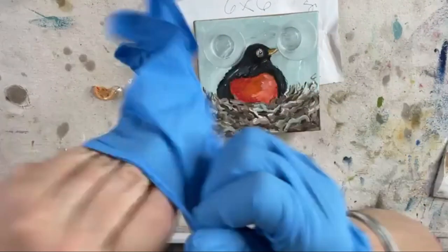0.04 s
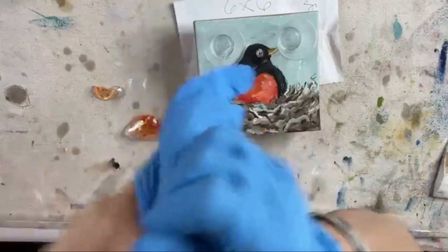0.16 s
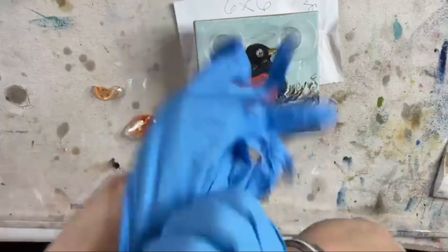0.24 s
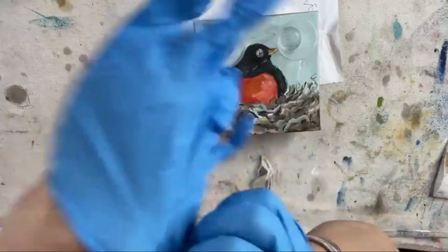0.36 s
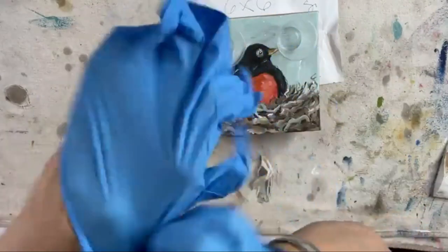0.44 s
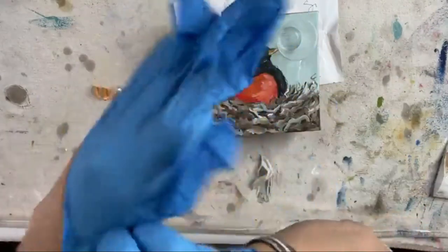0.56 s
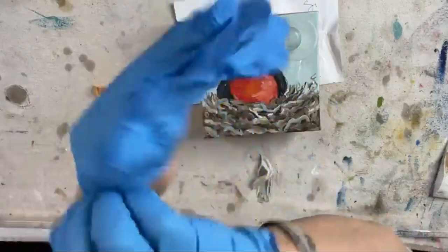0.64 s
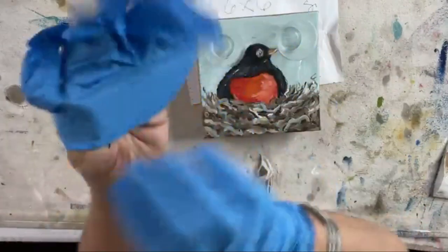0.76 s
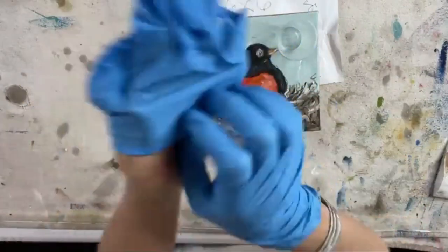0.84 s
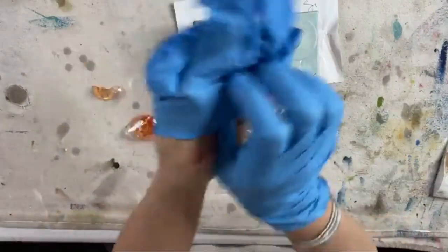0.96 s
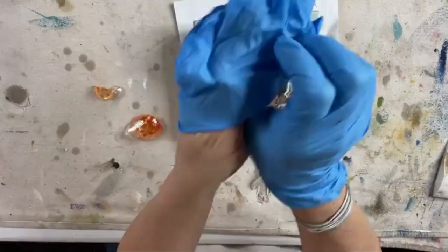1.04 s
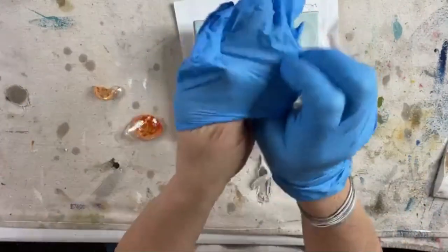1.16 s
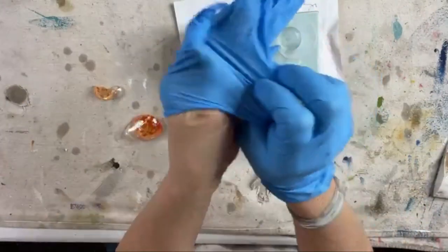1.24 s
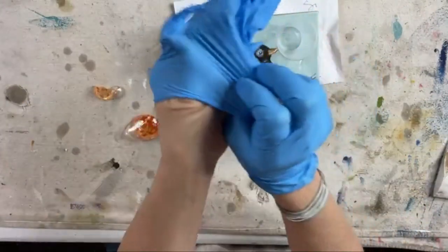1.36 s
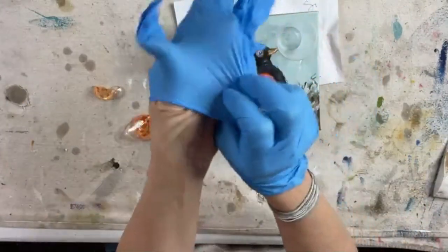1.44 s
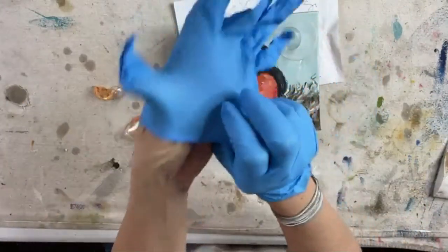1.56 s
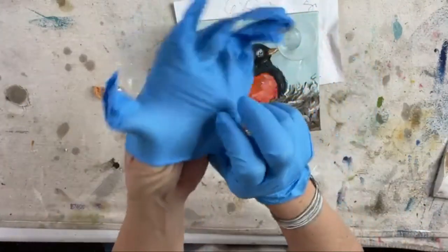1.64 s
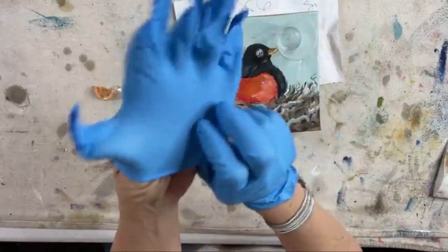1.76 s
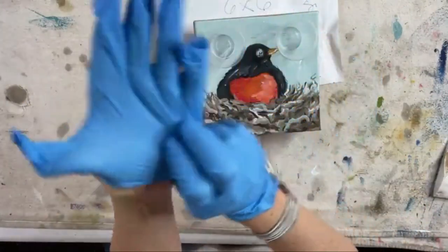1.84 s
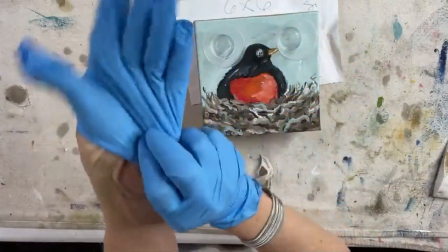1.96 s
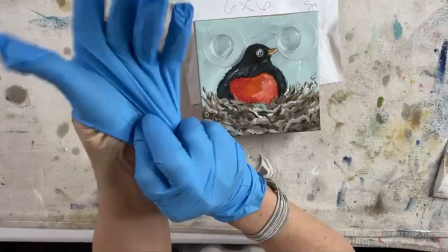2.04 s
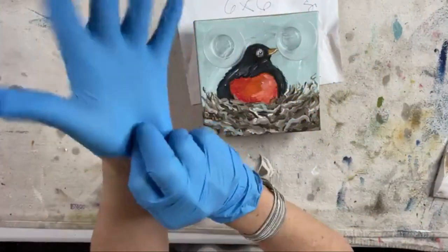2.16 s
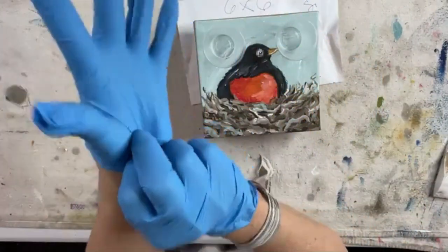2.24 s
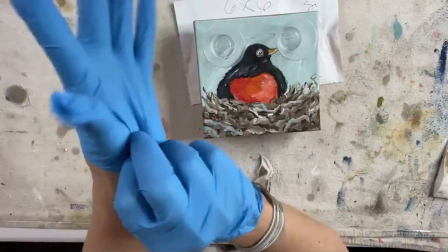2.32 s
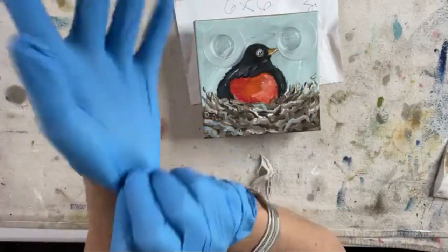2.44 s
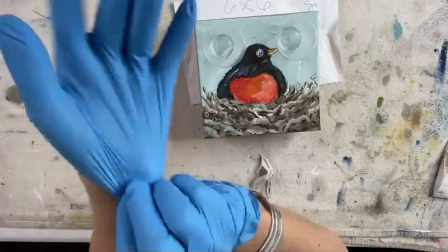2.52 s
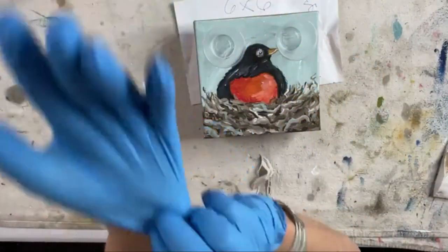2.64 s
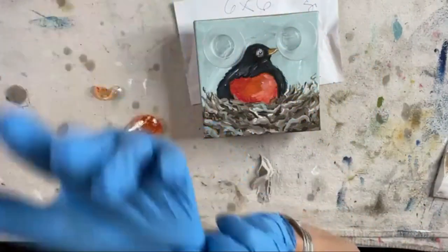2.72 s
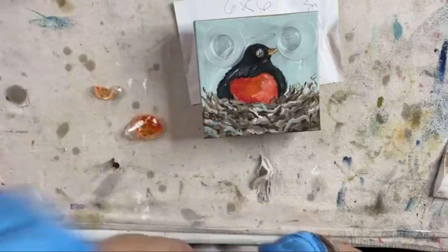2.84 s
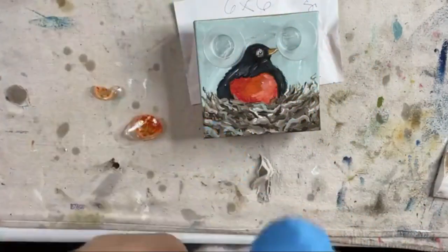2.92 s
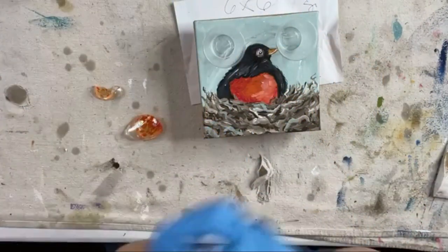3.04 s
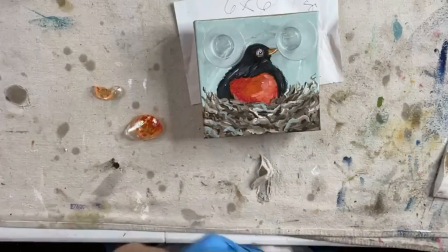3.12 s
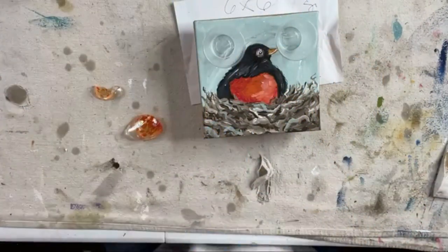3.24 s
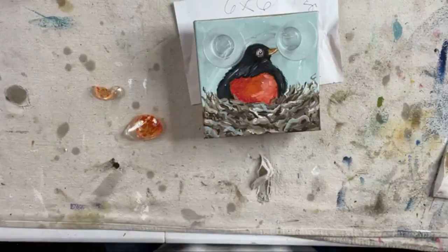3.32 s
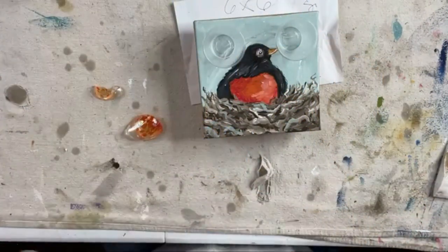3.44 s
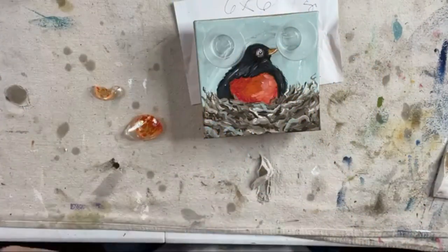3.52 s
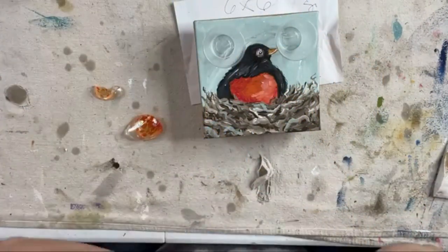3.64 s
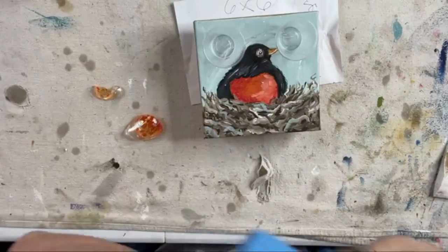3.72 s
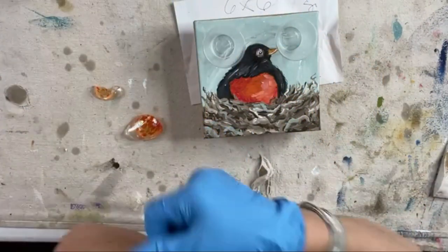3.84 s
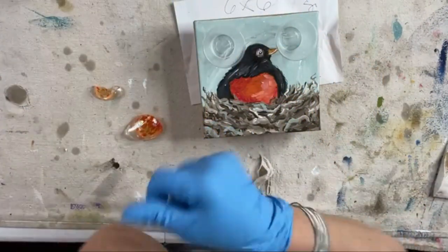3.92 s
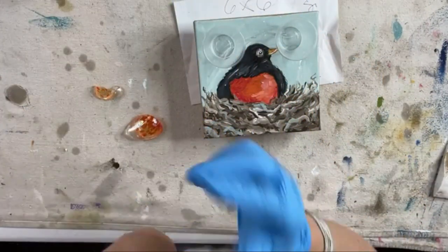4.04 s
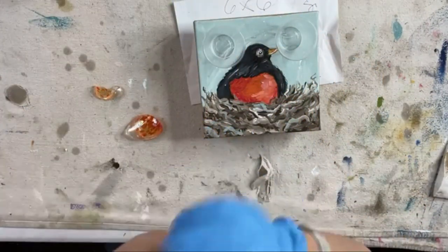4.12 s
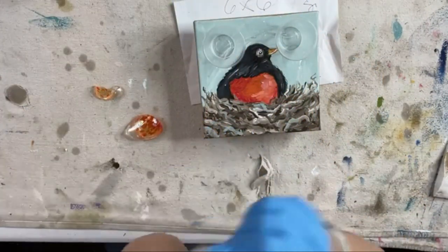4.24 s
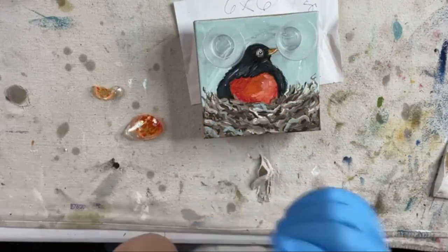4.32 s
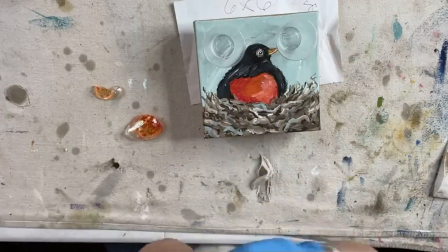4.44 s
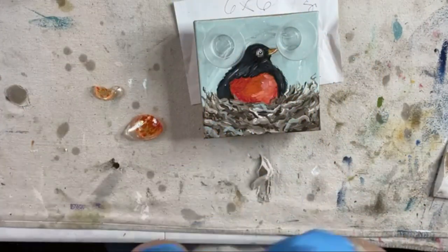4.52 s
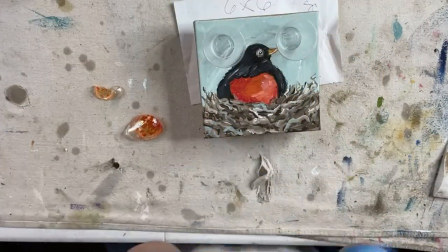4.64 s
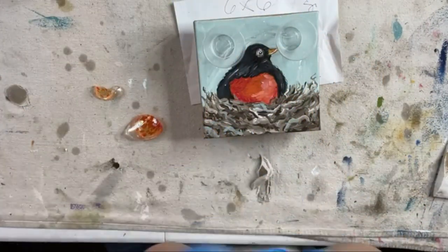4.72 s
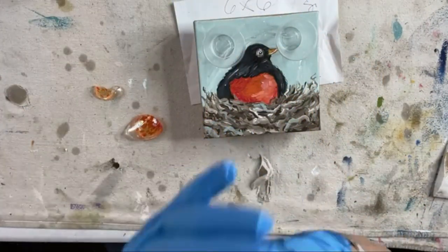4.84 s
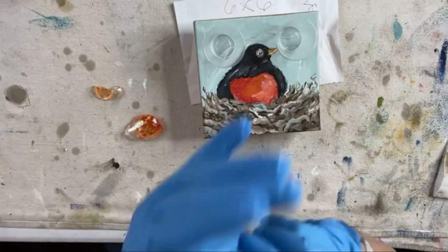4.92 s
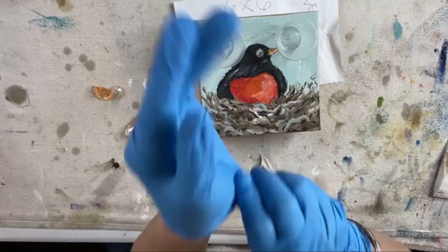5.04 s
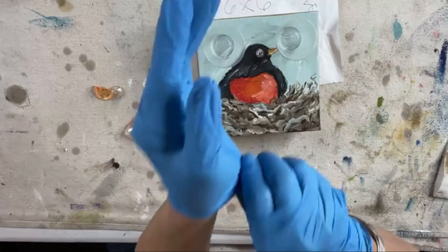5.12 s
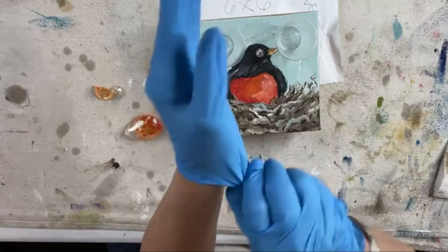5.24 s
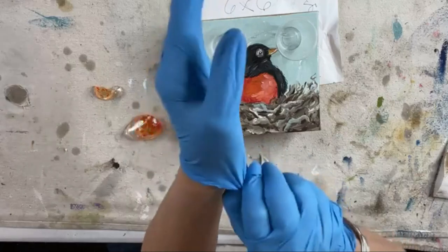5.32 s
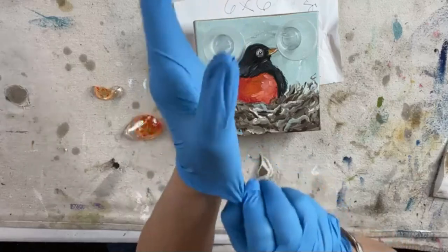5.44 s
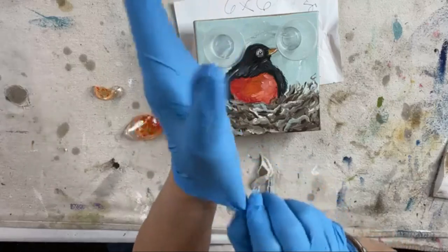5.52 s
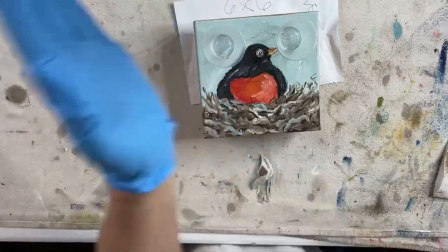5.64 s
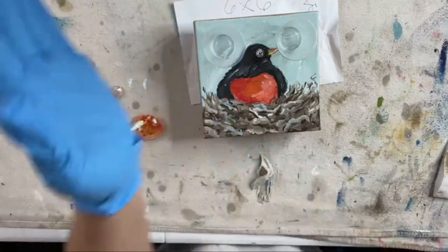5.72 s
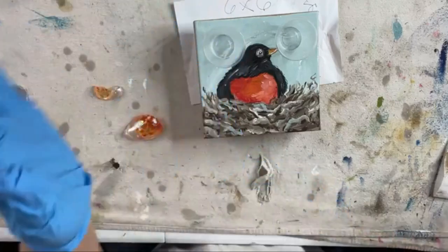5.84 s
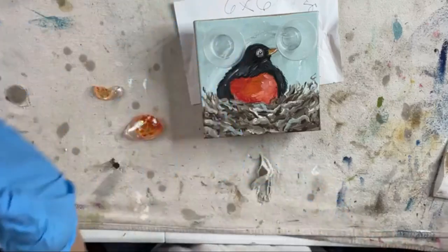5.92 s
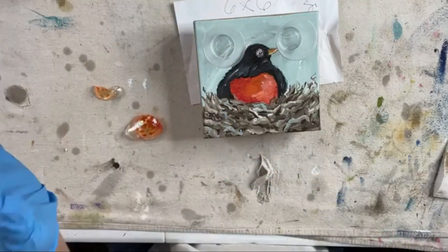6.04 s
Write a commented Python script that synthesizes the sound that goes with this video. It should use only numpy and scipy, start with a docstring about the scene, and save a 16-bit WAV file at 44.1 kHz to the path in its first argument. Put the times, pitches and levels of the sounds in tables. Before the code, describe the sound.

A thin rubber glove is pulled on close by, rustling and creaking, with sharp elastic snaps and one loudest snap near the end.

```python
"""In a small room, above a craft table, a thin rubber glove is pulled onto a hand close to the microphone.
Loose rubber rustles and hisses over skin, heard as filtered noise built from countless tiny clicks.
Stretched rubber creaks in stick-slip pulses that ring folds and drum the taut film, which also hums.
The cuff and the fingertips are plucked and snap back as bursts, falling rings and thumps; puffs of air
are low noise. The last snap is the loudest, and a bright band fades after it."""
import sys
import numpy as np
from scipy import signal
from scipy.fft import rfft, irfft
from scipy.io import wavfile

SR = 44100
rng = np.random.default_rng(int(sys.argv[2]) if len(sys.argv) > 2 else 0)


def dump(signal):
    """Clip the signal to [-1, 1] and save it as 16-bit WAV at the path in sys.argv[1]."""
    limited = np.clip(np.atleast_2d(signal).T, -1, 1)
    pcm = np.round(limited * 32767).astype(np.int16)
    wavfile.write(sys.argv[1], SR, pcm)


N = 267863
T = np.arange(N) / SR  # time [s]

# strokes of loose rubber over skin:
# (peak time [s], rise [s], fall [s], hiss level before tilt [dB], crumple level [dB])
STROKES = [ (0.13, 0.09, 0.053, -52, -54.5), (0.275, 0.06, 0.087, -49, -56.5),
           (0.375, 0.053, 0.07, -51.5, -55.5), (0.489, 0.055, 0.057, -44.5, -51.5),
           (0.635, 0.053, 0.044, -45, -50.5), (0.7, .06, 0.1, -58, -55.5),
           (0.827, 0.033, 0.018, -44.5, -66), (0.885, .09, 0.057, -56.5, -63),
           (0.99, 0.057, 0.057, -54.5, -57.5), (1.09, 0.036, 0.052, -46, -71),
           (1.162, 0.032, 0.037, -50, -83), (1.295, 0.056, 0.075, -53.5, -77),
           (1.46, 0.21, 0.49, -58.5, -54.5), (1.85, 0.082, 0.13, -60.5, -50),
           (1.97, 0.064, 0.069, -57, -52), (2.064, 0.089, 0.12, -50, -51.5),
           (2.275, 0.06, 0.13, -50.5, -53.5), (2.44, .08, .08, -57, -68), (2.6, 0.083, .12, -51, -49.5),
           (2.81, 0.07, 0.082, -53.5, -54), (2.945, 0.038, 0.018, -45, -54.5), (3.0, 0.055, 0.26, -65, -70),
           (3.09, 0.025, 0.017, -50, -73), (3.27, .04, 0.27, -59, -75), (3.547, 0.016, 0.027, -50.5, -61),
           (3.683, 0.042, 0.13, -49.5, -62.5), (4.005, 0.092, 0.055, -46, -53),
           (4.1, 0.047, .19, -65, -69.5), (4.369, 0.033, 0.031, -50.5, -64),
           (4.522, 0.014, 0.015, -50.5, -108), (4.655, 0.025, 0.016, -44, -58),
           (4.801, 0.013, 0.015, -47.5, -93), (4.92, 0.025, 0.058, -52, -66),
           (5.14, 0.11, 0.1, -58.5, -69.5), (5.241, 0.019, 0.016, -49.5, -57),
           (5.366, 0.024, 0.068, -59.5, -59), (5.57, 0.13, 0.13, -59, -57.5),
           (5.68, .04, 0.023, -53.5, -60), (5.89, 0.059, 0.17, -66, -67.5)]
# spectrum of slack rubber: (frequency [Hz], relative spectral density [dB])
SLACK_SPECTRUM = [(40, -49), (120, -11), (250, -0.5), (400, 4), (700, -2), (1300, 2), (2500, -2),
                  (5000, -13), (12000, -24.5)]
# spectrum of a slip or a sharp crease: (frequency [Hz], relative spectral density [dB])
SLIP_SPECTRUM = [(150, -16.5), (700, -1.5), (1500, -1.5), (4000, 6), (7000, -9.5), (10000, -35.5),
                 (16000, -46)]


def undb(db):
    """Amplitude ratio of a level in decibels."""
    return 10 ** (np.asarray(db) / 20)


def unit(x):
    """Normalization to a root-mean-square of 1."""
    return x / np.sqrt(np.mean(x ** 2) + 1e-20)


def high_pass(x, hz):
    """Fourth-order Butterworth attenuation below hz."""
    return signal.sosfilt(signal.butter(4, hz, "high", fs=SR, output="sos"), x)


def colour(x, points, size=2048):
    """Minimum-phase filtering: a folded cepstrum gives a causal response of unit energy through the points."""
    hz, db = np.transpose(points)
    f = np.maximum(np.arange(size // 2 + 1) * SR / size, 1)
    log_gain = np.log(undb(np.interp(np.log(f), np.log(hz), db)))
    cepstrum = irfft(log_gain)
    cepstrum[1:size // 2] *= 2
    cepstrum[size // 2 + 1:] = 0
    response = irfft(np.exp(rfft(cepstrum)))
    return signal.fftconvolve(x, response / np.linalg.norm(response))[:len(x)]


def ring(hz, t60, sag=0, size=4096):
    """Damped mode: as the rubber relaxes, pitch glides from half of the share sag above hz to half below."""
    decay = np.exp(-np.log(1000) * T[:size] / t60)
    phase = np.cumsum(hz * (1 + sag * (decay - .5))) / SR
    return np.sin(2 * np.pi * phase) * decay


def add(out, s, x):
    """Superposition of x onto out from time s."""
    i = int(np.clip(s * SR, 0, N))
    out[i:i + len(x)] += x[:N - i]


def walk(rate):
    """Random modulation: rate normal values per second, joined by lines, with a spread near 1."""
    steps = rng.standard_normal(4096)
    return 1.3 * np.interp(T * rate, np.arange(len(steps)), steps)


def grains(rate, spread_db):
    """Shot noise: clicks of uneven size at random instants, rate per second on average."""
    hit = rng.random(N) < rate / SR
    size = undb(spread_db * np.clip(rng.standard_normal(N), -2, 2))
    return unit(hit * rng.standard_normal(N) * size)


def swell(peak_s, rise_s, fall_s):
    """Envelope of one movement: peak gain 1, and 9.5 dB less one rise before or one fall after it."""
    drop_db, shape = 9.5, 1.5  # shape 1 is a pointed peak, 2 a round one
    near = slice(*np.searchsorted(T, [peak_s - 5 * rise_s, peak_s + 5 * fall_s]))
    away = np.maximum((peak_s - T[near]) / rise_s, (T[near] - peak_s) / fall_s)
    gain = np.zeros(N)
    gain[near] = undb(-drop_db * away ** shape)
    return gain


def swells(moves):
    """Incoherent summation: the powers of overlapping (peak s, rise s, fall s, dB) movements add."""
    return np.sqrt(sum((undb(db) * swell(peak, rise, fall)) ** 2 for peak, rise, fall, db in moves))


def quiet_air():
    """Stationary broadband noise forms the steady floor of the room."""
    # (frequency [Hz], relative spectral density [dB])
    air_spectrum = [(25, -20), (70, 2.5), (150, -3.5), (350, -7), (700, -11), (2000, -0.5), (5000, 2.5),
                    (9000, -13), (16000, -15.5)]
    return undb(-66.5) * colour(rng.standard_normal(N), air_spectrum)


def room(direct, spread, wet_db, size=32768):
    """Reflection and reverberation: table and wall echoes, and a tail whose decay depends on frequency."""
    # reverberation time: (frequency [Hz], time to fall by 60 dB [s])
    reverberation = [(100, 0.19), (350, 0.74), (1000, 0.88), (3300, 0.36), (6000, 0.47), (10000, 0.35),
                     (16000, 0.22)]
    table_s, table_db = 0.001309, -17
    wall_s, wall_db = .0115, -19
    t = T[:size]
    f = np.maximum(np.arange(size // 2 + 1) * SR / size, 1)
    hz, t60 = np.transpose(reverberation)
    noise = rfft(rng.standard_normal(size))
    # overlapping bands that sum to the full noise
    bands = [irfft(noise * np.interp(np.log(f), np.log(hz), band)) for band in np.eye(len(hz))]
    onset = np.clip((t - .003) / 0.0024, 0, 1)
    tail = sum(band * undb(-60 * t / decay) for band, decay in zip(bands, t60)) * onset
    out = direct + undb(wet_db) * signal.fftconvolve(spread, tail / np.linalg.norm(tail))[:N]
    add(out, table_s, undb(table_db) * direct)
    add(out, wall_s, undb(wall_db) * direct)
    return out


def puffing():
    """Turbulent flow: trapped air leaves the glove in soft low gusts of noise."""
    # gusts: (peak time [s], rise [s], fall [s], level [dB])
    gusts = [(0.31, 0.29, 0.47, -69.5), (0.486, 0.014, 0.022, -50), (0.625, 0.065, 0.031, -60),
             (1.663, 0.048, .05, -62), (2.055, 0.088, 0.036, -59.5), (4.61, .014, 0.016, -57.5),
             (4.89, 0.016, 0.033, -59), (5.707, 0.014, 0.012, -53)]
    # (frequency [Hz], relative spectral density [dB])
    gust_spectrum = [(25, -22), (55, -3), (90, -0.5), (180, -3.5), (400, -14), (1500, -52)]
    return swells(gusts) * colour(rng.standard_normal(N), gust_spectrum)


def shivering(start_s=5.708, low_hz=2900, high_hz=3850, level_db=-42, t60_s=0.71):
    """Exponential decay: after the hardest snap a bright band of noise lingers and fades."""
    band_filter = signal.butter(2, [low_hz, high_hz], "band", fs=SR, output="sos")
    band = signal.sosfilt(band_filter, rng.standard_normal(N))
    decay = (T > start_s) * np.exp(-np.log(1000) * np.abs(T - start_s) / t60_s)
    return undb(level_db) * unit(band) * decay


def humming(hz=338, waver=0.07, rough_db=2.5):
    """Self-sustained oscillation: slips in step with the palm film keep one rough, wavering note swinging."""
    # hums: (peak time [s], rise [s], fall [s], level [dB])
    hums = [(1.342, 0.022, 0.019, -55.5), (1.485, 0.044, 0.044, -44), (1.565, 0.056, 0.0596, -41)]
    phase = 2 * np.pi * np.cumsum(hz * (1 + waver * walk(140))) / SR
    swing = np.sin(phase) * undb(rough_db * walk(170))
    return high_pass(unit(swing), 240) * swells(hums)


def crumpling(crease_db=-7, patchy_db=2.46):
    """Buckling: slack folds give way in dense, dull ticks, among sparser, sharp crease flips."""
    folds = colour(grains(rate=3500, spread_db=2.5), SLACK_SPECTRUM) * undb(patchy_db * walk(45))
    creases = colour(grains(rate=70, spread_db=1.5), SLIP_SPECTRUM)
    *timing, _, crumple_db = np.transpose(STROKES)
    return (folds + undb(crease_db) * creases) * swells(zip(*timing, crumple_db))


def sliding(flutter_db=1.07, wander_db=1.13):
    """Sliding friction: countless micro-slips over skin hiss, more brightly where the rubber is taut."""
    # (frequency [Hz], relative spectral density [dB])
    hiss_spectrum = [(400, -37), (900, -18), (1300, -5.5), (2500, 1), (4000, 5.5), (7400, 3.5),
                     (9500, -1.5), (12000, -3), (15700, -7.5)]
    taut_tilt, tilt_hz = 0.17, 6640  # dB of tilt per dB of hiss over crumple, and its pivot
    hiss = colour(grains(rate=22000, spread_db=3.5), hiss_spectrum)
    treble = signal.sosfilt(signal.butter(1, tilt_hz, "high", fs=SR, output="sos"), hiss)
    *timing, hiss_db, crumple_db = np.transpose(STROKES)
    # taut rubber crumples little, so the excess of hiss stands for tautness
    tilt_db = taut_tilt * (hiss_db - crumple_db)
    flutter = undb(flutter_db * walk(200) + wander_db * walk(45))
    low_part = (hiss - treble) * swells(zip(*timing, hiss_db - tilt_db / 2))
    high_part = treble * swells(zip(*timing, hiss_db + tilt_db / 2))
    return flutter * (low_part + high_part)


def creaking(jitter=0.054, force_db=2.8, fold_scatter=0.13, patch_scatter=0.274):
    """Stick-slip friction: each slip scrapes, rings the fold that lets go and drums a patch of taut film."""
    # pulls on stretched rubber: (peak time [s], rise [s], fall [s], slip level [dB], film drum level [dB],
    # central fold frequency at full effort [Hz], mean slip rate [1/s])
    pulls = [ (1.135, .08, .08, -53.5, -94, 2030, 600), (1.33, 0.078, .035, -52, -77, 2000, 220),
             (1.402, 0.0045, 0.081, -48.5, -53, 1840, 150), (1.48, .04, .04, -44.5, -47, 1680, 160),
             (1.535, .04, 0.098, -42, -44.5, 1800, 105), (1.661, .01, .11, -48.5, -48.5, 1680, 110),
             (1.895, .1, 0.1, -49, -52.5, 1770, 165), (2.055, 0.031, 0.26, -54, -59, 3400, 150),
             (2.283, .04, 0.043, -48, -51, 2300, 140), (2.37, 0.045, .11, -54, -83, 3011, 165),
             (2.585, 0.055, .07, -52.5, -60.5, 2290, 170), (2.66, .07, .12, -50.5, -60, 3900, 175),
             (2.806, .05, .07, -49, -62.5, 3735, 140), (2.921, .06, 0.019, -50, -68, 3454, 170),
             (3.68, 0.092, 0.091, -54.5, -69, 3338, 276), (3.9, 0.12, .04, -61.5, -66.5, 2646, 276),
             (5.38, 0.045, 0.087, -69, -66.5, 2444, 278), (5.58, 0.13, .14, -59, -56, 3600, 225)]
    fold_db, scrape_db = -1.5, -9.0
    scrape_s = 0.0018  # time constant
    patch_hz, patch_t60 = 425, 0.028  # central frequency at 140 slips per second, and decay [s]
    *_, slip_db, film_db, pull_hz, pull_rate = np.transpose(pulls)
    effort = np.array([swell(*pull[:3]) for pull in pulls]) ** 2 + 1e-12
    slip_gain, film_gain = np.sqrt(undb([slip_db, film_db]) ** 2 @ effort)
    # averages weighted by effort: the strongest pull dominates the slip rate and fold pitch
    total = effort.sum(axis=0)
    rate = pull_rate @ effort / total
    # fold pitch is higher at weak effort: 0.0041 in log frequency per dB
    fold_hz = pull_hz @ effort / total * np.exp(-0.0041 * 10 * np.log10(total))
    phase = np.cumsum(rate * np.exp(jitter * walk(150))) / SR
    slips = np.flatnonzero(np.diff(np.floor(phase)))
    chance = np.clip(rng.standard_normal((len(slips), 3)), -1.7, 1.7)
    folds, film, scrapes = np.zeros((3, N))
    burst = np.exp(-T[:512] / scrape_s)
    noise = rng.standard_normal(N + len(burst))
    for i, (force, fold_shift, patch_shift) in zip(slips, chance):
        # rare slips have stored more stretch than quick ones
        size = undb(force_db * force) / np.sqrt(rate[i])
        hz = fold_hz[i] * np.exp(fold_scatter * fold_shift)
        # a fold rings for about fourteen cycles, so small bright ones die sooner
        add(folds, T[i], size * np.sqrt(hz) * ring(hz, 14 / hz, sag=.2, size=1024))
        add(scrapes, T[i], size * burst * noise[i:i + len(burst)])
        # quicker slips free smaller, higher patches
        drum_hz = patch_hz * (rate[i] / 140) ** .5 * np.exp(patch_scatter * patch_shift)
        add(film, T[i], size * ring(drum_hz, patch_t60, size=2048))
    # such small areas of rubber radiate little bass
    fold_ticks = undb(fold_db) * unit(high_pass(folds, 970))
    scrape_ticks = undb(scrape_db) * unit(colour(scrapes, SLIP_SPECTRUM))
    return slip_gain * (fold_ticks + scrape_ticks) + film_gain * unit(high_pass(film, 192))


def snapping(ring_t60=0.0051, thump_hz=350, thump_t60=0.013, contact_shape=1.25, slap_db=-10):
    """Impact excitation: released rubber cracks on skin, its slackening film rings and the flesh thumps.
    Returns the sound toward the microphone and the sound spread into the room."""
    # snaps: (time [s], crack level [dB], contact length to 1/e [ms], mid-glide ring frequency [Hz],
    # ring level [dB], thump level [dB])
    snaps = [ (0.0225, -50.5, 5, 750, -30, -39), (0.1691, -51, 6.6, 2660, -31.5, -40.5),
             (0.4681, -26.5, 2.35, 2740, -23, -28.5), (0.481, -32, 5.1, 2400, -27, -30),
             (0.81, -37.5, 5.3, 3180, -34, -68), (0.839, -36, 1.5, 4900, -48, -52),
             (1.584, -43, 0.9, 2840, -34, -54), (1.614, -53, 1.5, 1570, -25.5, -31.5),
             (1.6681, -34.5, 4.48, 2980, -24.5, -37.5), (1.9051, -48, 1.4, 2100, -21.5, -46),
             (1.9226, -41, 1.6, 1540, -21.5, -28), (2.9429, -32.5, 6.6, 4900, -46, -70),
             (2.9477, -24.5, 3.7, 1705, -55, -30.5), (3.2306, -39, 10.6, 4000, -48, -60),
             (3.9299, -26.5, 2.8, 2997, -15, -53), (3.941, -46, 3, 3190, -24.5, -49),
             (4.049, -27.5, 4.3, 3930, -22, -39), (4.3024, -32.5, 3.8, 3100, -46, -67),
             (4.311, -42.5, 6.3, 5500, -48, -47), (4.3646, -41.5, 10, 4500, -34, -45),
             (4.5918, -32.5, 2.1, 5030, -16, -48), (4.595, -32, 3.8, 2780, -29, -48),
             (4.662, -35.5, 3.2, 1550, -43, -56), (4.8675, -36, 3.2, 4940, -20.5, -47.5),
             (4.873, -29, 4.1, 4660, -50, -61), (5.1105, -45.5, 1, 4000, -40, -71),
             (5.259, -43, 1.1, 6000, -45, -70), (5.665, -42, 1.5, 3507, -40, -47),
             (5.6985, -18, 3.26, 3220, -14.5, -18.5)]
    # (frequency [Hz], relative spectral density [dB])
    crack_spectrum = [(60, 0), (300, -5), (700, -2.5), (1200, 1), (2000, 1), (3200, 4.5), (6000, 3.5),
                      (8000, -1), (10500, -4), (15500, -3.5)]
    flesh_room_db, ring_room_db = -3, -2.5  # shares that spread into the room
    cracks, clicks, rings, thumps, slaps = np.zeros((5, N))
    t = T[:4096]
    for s, crack_db, length_ms, hz, ring_db, thump_db in snaps:
        contact = np.exp(-(1000 * t / length_ms) ** contact_shape)
        burst = unit(rng.standard_normal(len(t)) * contact) * np.sqrt(np.mean(contact ** 2))
        add(cracks, s, undb(crack_db) * burst)
        # summed over all directions the crack is as even in colour as one click of the same energy
        add(clicks, s, undb(crack_db) * np.linalg.norm(contact, keepdims=True))
        add(rings, s, undb(ring_db) * ring(hz, ring_t60, sag=0.11))
        # the flesh answers about a millisecond later
        add(thumps, s + 0.00097, undb(thump_db) * ring(thump_hz, thump_t60, sag=0.091))
        # a broad piece of rubber that thumps the flesh also slaps it dully
        add(slaps, s, undb(thump_db + slap_db) * burst)
    rings = high_pass(rings, 670)
    flesh = thumps + colour(slaps, SLACK_SPECTRUM)
    direct = high_pass(colour(cracks, crack_spectrum) + flesh, 152) + rings
    room_impacts = colour(clicks, crack_spectrum) + undb(flesh_room_db) * flesh
    spread = high_pass(room_impacts, 202) + undb(ring_room_db) * rings
    return direct, spread


def scene():
    """Superposition: the glove sounds in the room, the fading bright band and the quiet air."""
    rubbing = sliding() + crumpling() + puffing() + creaking() + humming()
    snaps, snap_spread = snapping()
    glove = room(rubbing + snaps, rubbing + snap_spread, wet_db=-11.5)
    return (glove + shivering() + quiet_air())[None]


def record(dry):
    """Band limitation: the microphone thins the deep bass and the top is cut steeply above 16.2 kHz."""
    thin = signal.sosfilt(signal.butter(2, 60, "high", fs=SR, output="sos"), dry)
    # tenth-order elliptic: 0.2 dB passband ripple, 80 dB stopband attenuation
    return signal.sosfilt(signal.ellip(10, .2, 80, 16200, fs=SR, output="sos"), thin)


dry = scene()
out = record(dry)
dump(out)
```